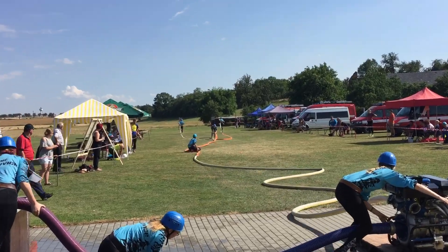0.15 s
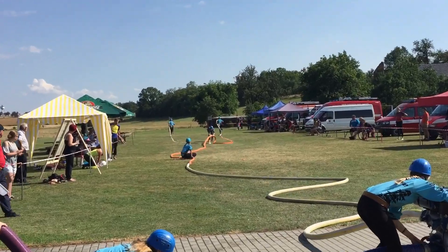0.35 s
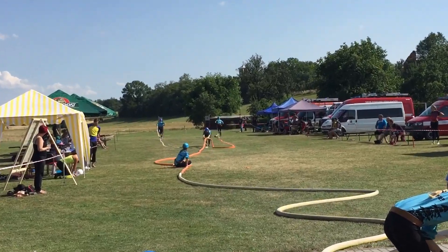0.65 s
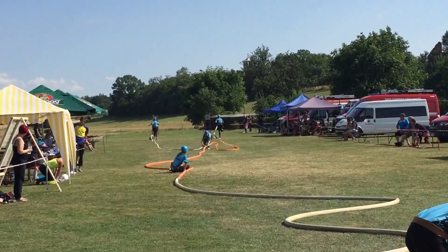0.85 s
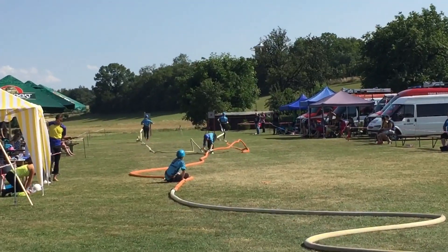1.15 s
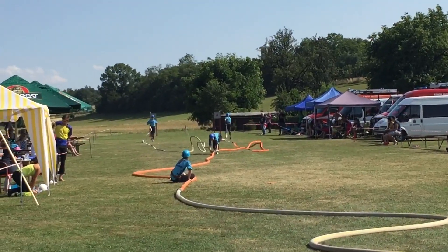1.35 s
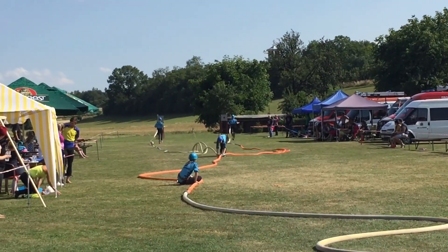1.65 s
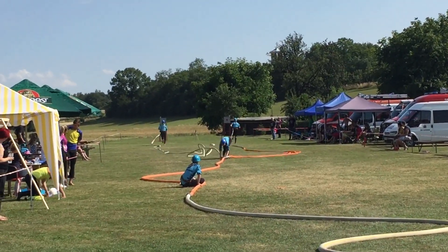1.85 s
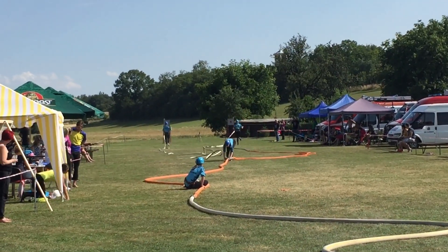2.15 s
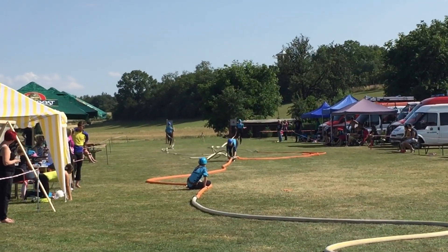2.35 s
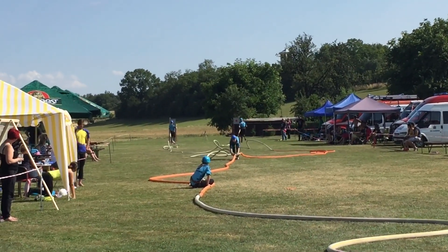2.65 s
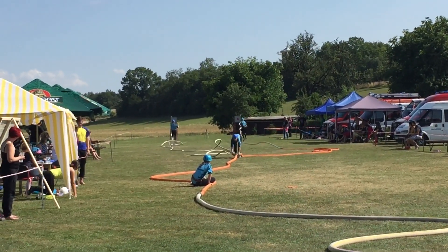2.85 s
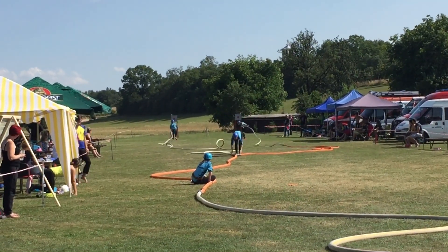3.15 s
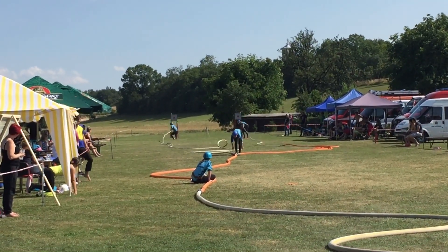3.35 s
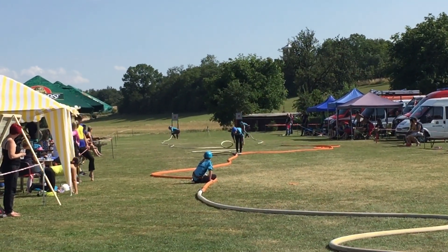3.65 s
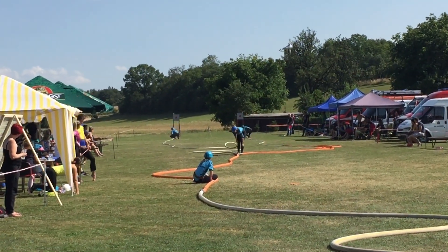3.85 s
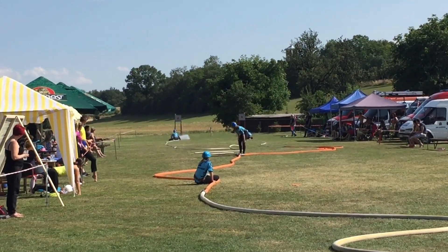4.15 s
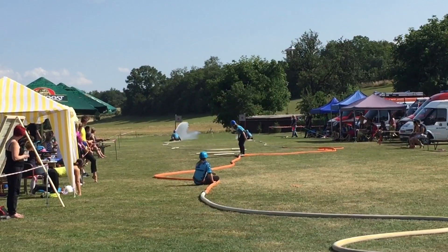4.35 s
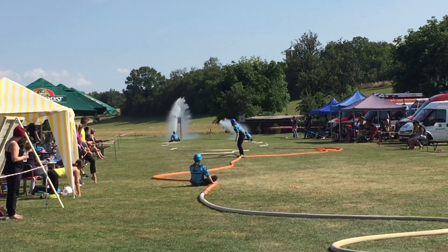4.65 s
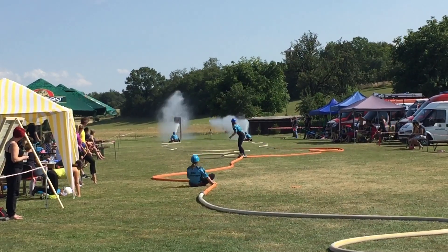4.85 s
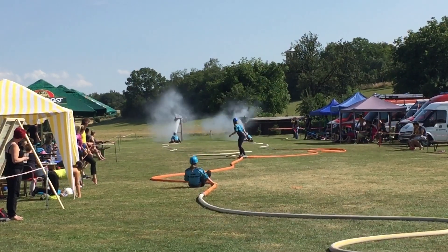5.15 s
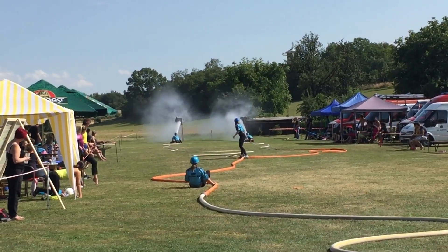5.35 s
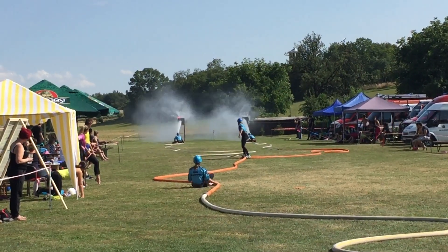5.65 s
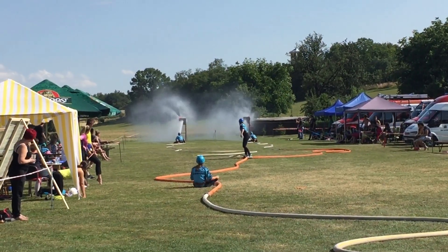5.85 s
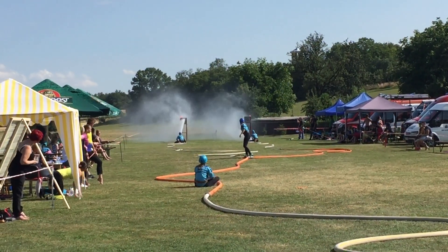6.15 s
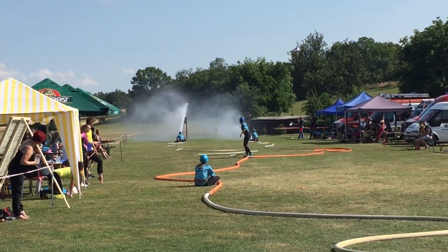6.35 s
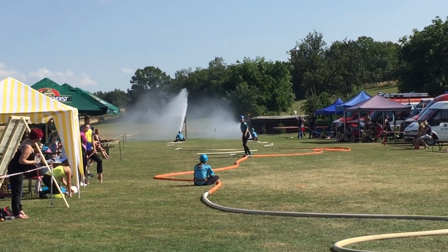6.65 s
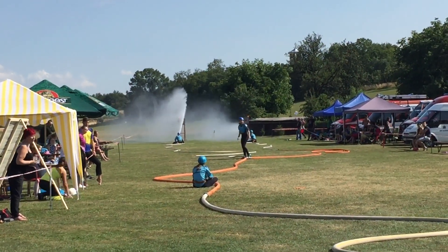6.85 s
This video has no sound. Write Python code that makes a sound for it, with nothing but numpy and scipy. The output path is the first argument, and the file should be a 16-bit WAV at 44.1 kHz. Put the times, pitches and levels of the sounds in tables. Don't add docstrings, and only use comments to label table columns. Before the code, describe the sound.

A small four-cylinder petrol engine driving a pump runs throughout, a few metres from a phone on an open field. From 0 to 1.8 seconds it holds a dense, rough drone, firing about 125 to 129 times a second, with fast metallic clatter, ringing block noise and breathy exhaust hiss. Around 2 seconds the pitch steps up slightly and creeps higher until 3.3, with one faint pop near 2.4. It eases and softens from about 3.6 to 4.4. From 4.5 it revs hard, growing louder and brighter and reaching about 160 firings a second near 6; from 5.3 to 6.25 irregular low pops crackle through the roar. Around 6.3 to 6.5 the throttle is cut: loudness falls sharply, pitch slides down, and a duller, quieter drone continues to 7 seconds. A low, wavering rumble reflected from ground and trees lies beneath.

```python
import sys
import numpy as np
from scipy import signal
from scipy.fft import rfft, irfft
from scipy.io import wavfile
from scipy.ndimage import uniform_filter1d

SR = 44100
rng = np.random.default_rng(int(sys.argv[2]) if len(sys.argv) > 2 else 0)


def elevation(decibels):
    levels = np.asarray(decibels, float)
    return 10 ** (levels / 20)


def store_wav(level_fs):
    pcm = np.round(np.clip(np.atleast_2d(level_fs), -1, 1) * 32767)
    wavfile.write(sys.argv[1], SR, pcm.T.astype(np.int16))


N = 308259

# columns t/s, firing rate f/Hz
FIRING_RATE = [(0, 125.6), (.3, 126.4), (1.05, 129.1), (1.4, 128.8), (1.8, 126.1), (2.0, 133.6),
               (2.6, 137.3), (3.25, 141.4), (3.42, 139.8), (3.72, 134.2), (4.42, 134.9), (4.72, 142.4),
               (5.5, 157.7), (6.0, 159.8), (6.24, 159.1), (6.55, 142), (6.9, 132.1), (6.99, 131.6)]
# columns t/s, throttle
THROTTLE = [(0, -0.054), (1.75, -0.075), (2, -0.011), (3.4, 0.1), (3.6, -0.013), (4.4, -0.037), (4.7, 0.17),
            (5, 0.43), (6.25, 0.46), (6.4, 0.32), (6.55, -0.44), (6.99, -0.17)]
# columns t/s, engine level/dB, cylinder unevenness/dB, brightness/dB per partial
EFFORT = [(0, -17, 4.5, .1), (.8, -18, 2.5, 0.3), (1.0, -16.5, 1, -0.7), (1.45, -18, 4, -0.8),
          (1.72, -19.5, 3.5, -0.7), (1.9, -16.5, 2, 0), (2.35, -17, 0.5, -0.2), (2.9, -16.5, -0.5, -0.2),
          (3.44, -17, 1.5, 0.5), (3.58, -20, 1, 0.7), (4.45, -18.5, 1, 0.5), (5.1, -13, 0, 0.6),
          (5.5, -13, -1, -.3), (6.15, -13, 10.5, -0.7), (6.29, -15, -2, -0.5), (6.41, -24, 2, 2.5),
          (6.8, -27.5, -0.5, -2.5), (6.99, -24.5, 10.5, -3)]
# columns f/Hz, level over the engine/dB
PIPE = [(148, -6.5), (160, -3), (256, -0.5), (300, -4.5), (320, -0.5), (382, -6.5), (415, -3), (478, -5.5)]
# columns multiple of firing rate, level under their leader/dB, phase/turns
SHAFT_PARTIALS = [(1.5, -1.5, 0.123), (2.5, -4.5, 0.098), (3.5, -10, -0.084)]
# columns multiple of firing rate, level under the raps when shut/dB, gain wide open/dB, phase/turns
UPPER_PARTIALS = [(4, -15.5, -6.5, 0.72), (4.5, -27, -5, 0.42), (5, -20, 23, 0.1), (5.5, -22.5, -26, 0.057),
                  (6, -24.5, -7, 0.56), (6.5, -21, -20, 0.76), (7, -13.5, 17, 0.45), (8, -21.5, -9, 0.29),
                  (8.5, -14.5, 18.5, 0.26), (11, -18.5, 18, 0.25), (12, -28, 29, 0.69),
                  (13, -29.5, 33, 0.79), (15, -25, 32, 0.13), (17, -28, 32, 0.54)]
# columns multiple of firing rate, level under partial 2/dB
CAM_PARTIALS = [(.75, -58), (1.25, -22.5), (1.751, -27), (2.249, -24.5), (2.75, -25), (3.25, -25),
                (3.748, -29), (4.25, -36)]
# columns delay/turns, level when shut/dB, gain wide open/dB
KNOCKS = [
    (0, 0, 0),
    (.36, -12, 5),
    (.69, -15, 9),
]
# columns f/Hz, width/Hz, level/dB
LOW_BODY = [(856, 65, 2), (1098, 134, 3), (1347, 105, 7.5), (1826, 108, 1)]
# columns f/Hz, width/Hz, level/dB
HIGH_BODY = [(1939, 87, 0), (2426, 106, -0.5), (2688, 43, -1.5), (3025, 157, -1), (3593, 305, -3.5),
             (4020, 57, -3.5), (4400, 330, -16.5), (4566, 51, -6.5)]
# columns f/Hz, width/Hz, level/dB
COVER = [(5240, 930, -10), (5917, 190, 2), (6625, 206, -4.5)]
# columns f/Hz, level/dB per Hz
GAS_HISS = [(3530, -25.5), (6000, -1), (6300, -19), (6800, -8.5), (7290, -8.5), (9100, -7.5), (10500, -17),
            (12200, -10.5), (15100, -14.5), (15800, -9)]
# columns t/s, peak level/dB
POPS = [(2.368, -33), (4.902, -21), (5.321, -10), (5.346, -7.5), (5.375, -17), (5.398, -14), (5.44, -22),
        (5.488, -13), (5.579, -17), (5.592, -10), (5.621, -16), (5.678, -18), (5.692, -11), (5.716, -11),
        (5.766, -7), (5.783, -14), (5.827, -12), (5.868, -13), (5.89, -18), (5.917, -8), (5.943, -9.5),
        (5.992, -18), (6.02, -16), (6.043, -16), (6.071, -10), (6.096, -9), (6.144, -17), (6.17, -14),
        (6.217, -17), (6.257, -17)]
# columns f/Hz, level/dB per Hz
RUMBLE = [(15, -72), (25, -17), (128, 0), (224, 5.5), (273, 5), (324, -19), (409, 6.5), (484, 0.5),
          (1000, 4), (1300, -49), (2200, -120)]
# columns level at light load/dB, share of the level change, gain wide open/dB
HUMP_LAWS = [
    (-18, 0.75, -1.2),
    (-18, 0.86, -3.5),
    (-18, 0.6, -1.3),
]

RAP_LAW, GAS_LAW, HISS_LAW = (-20, 0.79, 0.092), (-17.8, 0.86, 0.1), (-30.5, 1.04, 0.1)
SHAFT_LAW, WEAK_LAW = (-33, 0.38, -4), (-10, -0.27, 4.4)
WEAK_PER_UNEVEN = -0.27
LIGHT_LOAD_DB = -18
FLYWHEEL_S = 0.079
PIPE_NULL_HZ, PIPE_NULL_WIDTH_HZ, PIPE_NULL_DB = 568, 28.5, -7.5
POP_LENGTH_S = 0.011


def exhaust(turns, hump_db, shaft_db, rap_db, throttle):
    def partial(multiple, db, phase=0.0, wobble_db=0.6):
        swing = np.cos(2 * np.pi * (multiple * turns - phase))
        return np.sqrt(2) * elevation(db + wobble_db * walk(12)) * swing

    def pipe_null(f):
        return PIPE_NULL_DB * np.exp(-((f - PIPE_NULL_HZ) / PIPE_NULL_WIDTH_HZ) ** 2)

    db1, db2, db3 = hump_db
    hump = partial(1, db1, 0.016, 0.23) + partial(2, db2, 0.055, 0.11) + partial(3, db3, -0.025, 0.17)
    firing_hz = np.gradient(turns) * SR
    upper = sum(partial(m, rap_db + db + open_db * throttle + pipe_null(m * firing_hz), phase)
                for m, db, open_db, phase in UPPER_PARTIALS)
    shaft = partial(0.49, 0.35 * db1 + 0.7 * shaft_db - 15.5, 0.34, 0.6)
    shaft = shaft + sum(partial(m, shaft_db + db, phase) for m, db, phase in SHAFT_PARTIALS)
    cam = sum(partial(m, db2 + db, rng.random(), 0.5) for m, db in CAM_PARTIALS)
    return hump + upper + shaft + cam


def block(turns, rap_db, gas_db, weak_db, hiss_db, throttle):
    turns = turns + 0.49
    firing = np.floor(turns).astype(int)
    chance = rng.standard_normal((firing[-1] + 1, 3)).T
    count = np.arange(1, firing[-1] - 1)
    cylinder_db = np.array([-0.95, -0.6, -3.5, 1.0])

    raps = np.zeros(N + 1)
    for delay, db, open_db in KNOCKS:
        at = np.interp(count + delay, turns, np.arange(N))
        scatter = 2.2 - 2.4 * throttle[at.astype(int)]
        at = at + scatter * chance[0, count]
        i = np.clip(at.astype(int), 0, N - 1)
        cylinder = weak_db[i] * (count % 2) + cylinder_db[count % 4]
        size = elevation(db + open_db * throttle[i] + cylinder + 0.44 * chance[1, count])
        raps[i] += size * (1 - at % 1)
        raps[i + 1] += size * (at % 1)
    raps = raps[:N]

    since = turns - firing
    strength_db = weak_db * (firing % 2) + cylinder_db[firing % 4]
    puff_shape = (1 - np.exp(-since / 0.06)) * np.exp(-since / 0.33)
    puff = elevation(0.6 * strength_db + 1.5 * chance[2, firing]) * puff_shape + 0.16
    noise = puff * rng.standard_normal((4, N))

    low_knock = (0.8 + 0.17 * throttle) * level(ring(raps, LOW_BODY, 1.5), 0)
    low_gas = (0.42 - 0.24 * throttle) * level(ring(noise[0], LOW_BODY), 0)
    regular = 0.76 + 0.27 * throttle
    high_knock = regular * level(ring(raps, HIGH_BODY, 1.6), 0)
    high_gas = np.sqrt(1 - regular ** 2) * level(ring(noise[1], HIGH_BODY), 0)
    cover = level(ring(noise[2] + (7 + 7 * throttle) * raps, COVER), -5.5)
    hiss = level(coloured(puff ** 0.057 * noise[3] + 3 * raps, GAS_HISS), 1.83)

    low = elevation(rap_db - 2.0) * (low_knock + low_gas)
    high = elevation(gas_db - 2.5 + 0.25 * walk(8.9)) * (high_knock + high_gas + cover)
    return low + high + elevation(hiss_db) * hiss


def pops(turns):
    out = np.zeros(N + SR)
    t = np.arange(SR // 10) / SR
    for (s, db), (a, b) in zip(POPS, rng.standard_normal((len(POPS), 2))):
        hz = (52 + 6 * a) + (520 + 40 * b) * np.exp(-t / 0.004)
        fade = np.exp(-(t / POP_LENGTH_S / (1 + 0.13 * b)) ** 2 / 3)
        pop = np.sin(2 * np.pi * np.cumsum(hz) / SR) * fade
        hump_turn = np.round(turns[int(s * SR)] + 0.15) - 0.15
        start = np.searchsorted(turns, hump_turn)
        out[start:start + len(t)] += elevation(db) * pop
    return out[:N]


def rumble(rap_db, throttle):
    smear = level(coloured(rng.standard_normal(N), RUMBLE), -15.5)
    return elevation(rap_db - 3 * throttle + 0.9 * walk(7)) * smear


def level(x, db):
    return x * elevation(db) / np.sqrt(np.mean(x ** 2))


def curves(table):
    s, *columns = np.transpose(table)
    return [np.interp(np.arange(N) / SR, s, c) for c in columns]


def walk(rate):
    k = int(SR / rate)
    held = np.repeat(rng.standard_normal(N // k + 1), k)
    return 0.98 * uniform_filter1d(uniform_filter1d(held, k), k)[:N]


def coloured(x, spectrum):
    hz, db = np.transpose(spectrum)
    f = np.fft.rfftfreq(N, 1 / SR) + 1
    gain_db = np.interp(np.log(f), np.log(hz), db, left=-90, right=-90)
    return irfft(rfft(x) * elevation(gain_db), N)


def ring(x, modes, damping=1.0):
    out = 0
    for k, (hz, width, db) in enumerate(modes):
        peak = signal.iirpeak(hz, hz / width / damping, fs=SR)
        out = out + (-1) ** k * elevation(db) * signal.lfilter(*peak, x)
    return out


def scene():
    hz = uniform_filter1d(curves(FIRING_RATE)[0], int(FLYWHEEL_S * SR), mode="nearest")
    turns = np.cumsum(hz) / SR
    level_db, uneven_db, bright_db = curves(EFFORT)
    throttle = np.clip(curves(THROTTLE)[0], -1, 1)

    def follow(law):
        light_db, share, open_db = law
        return light_db + share * (level_db - LIGHT_LOAD_DB) + open_db * throttle

    pipe_hz, pipe_db = np.transpose(PIPE)
    hump_db = []
    for k, law in enumerate(HUMP_LAWS):
        pipe_gain_db = np.interp(np.log((k + 1) * hz), np.log(pipe_hz), pipe_db)
        hump_db.append(follow(law) + k * bright_db + pipe_gain_db)

    rap_db = follow(RAP_LAW)
    weak_db = follow(WEAK_LAW) + WEAK_PER_UNEVEN * uneven_db
    drone = exhaust(turns, hump_db, follow(SHAFT_LAW) + uneven_db, rap_db, throttle)
    clatter = block(turns, rap_db, follow(GAS_LAW), weak_db, follow(HISS_LAW), throttle)
    return (drone + clatter + rumble(rap_db, throttle) + pops(turns))[None]


def band_limit(x):
    return signal.sosfilt(signal.butter(12, 15920, fs=SR, output="sos"), x)


def record(dry):
    bass_cut = signal.butter(2, 30, "high", fs=SR, output="sos")
    top_cut = signal.ellip(8, 0.2, 60, 15870, fs=SR, output="sos")
    x = signal.sosfilt(bass_cut, dry)
    rounded = 1.15 * np.tanh(0.97 * x)
    mix = signal.sosfilt(top_cut, rounded)
    return band_limit(mix)


dry = scene()
out = record(dry)
store_wav(out)
```